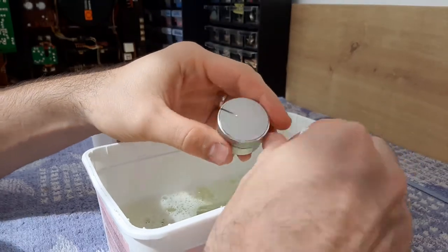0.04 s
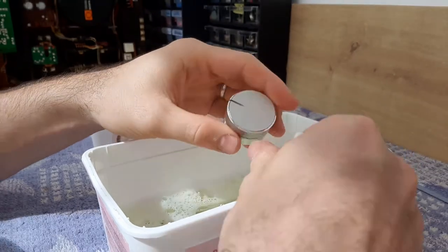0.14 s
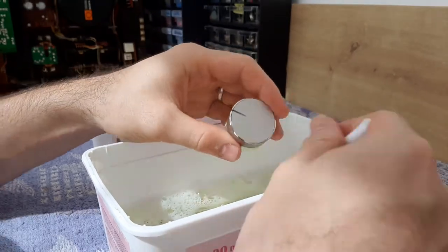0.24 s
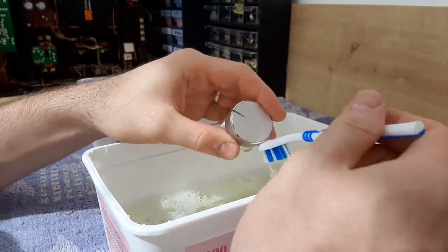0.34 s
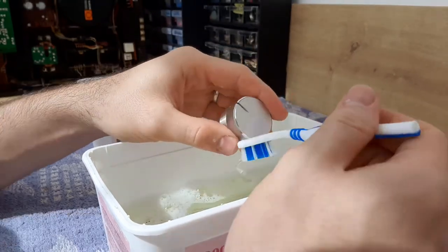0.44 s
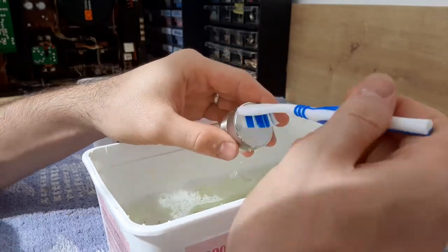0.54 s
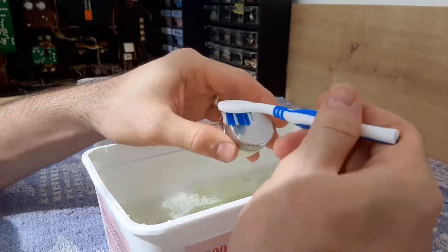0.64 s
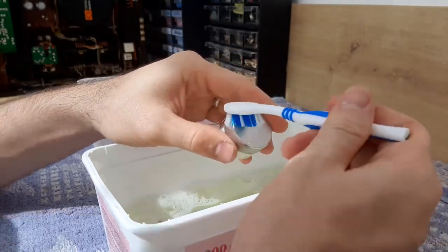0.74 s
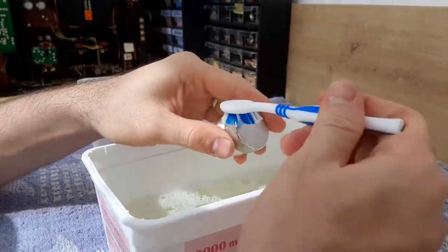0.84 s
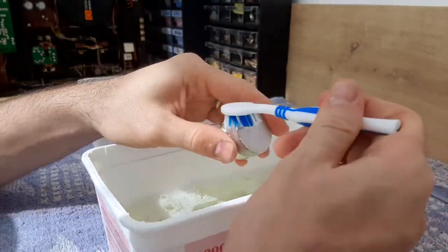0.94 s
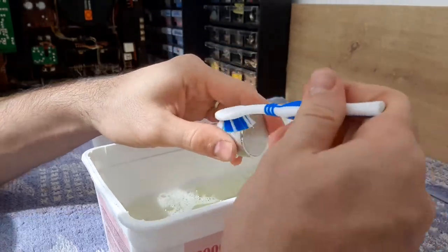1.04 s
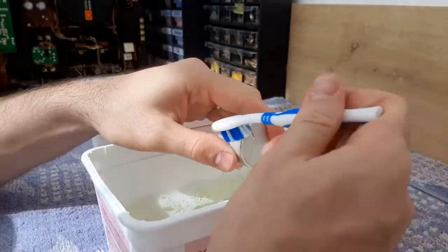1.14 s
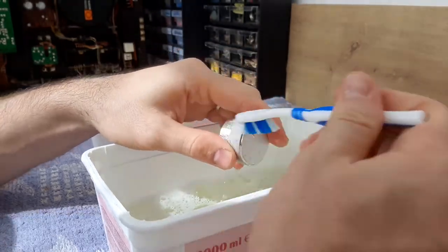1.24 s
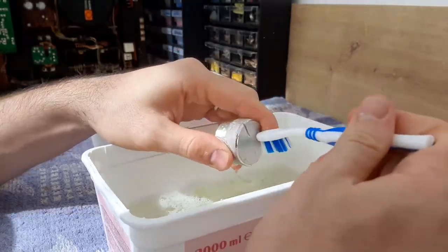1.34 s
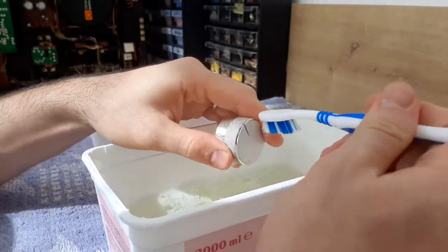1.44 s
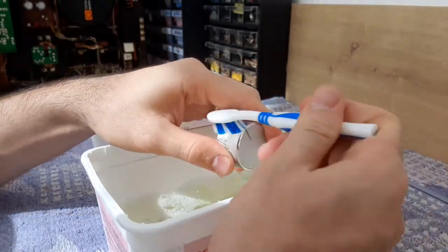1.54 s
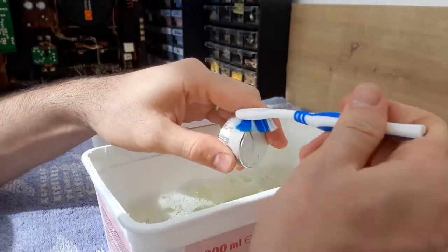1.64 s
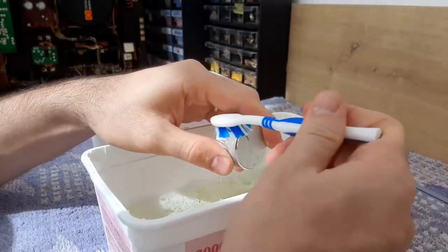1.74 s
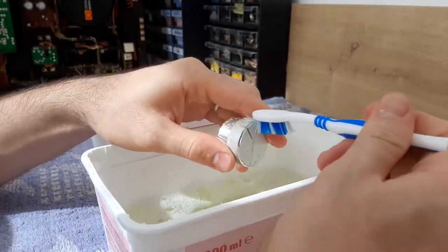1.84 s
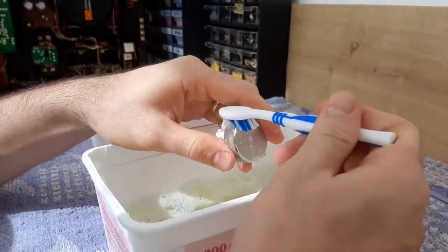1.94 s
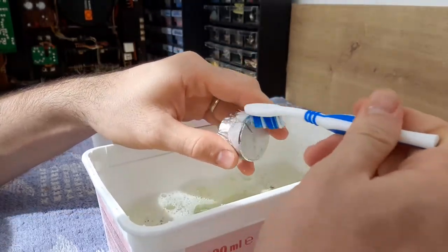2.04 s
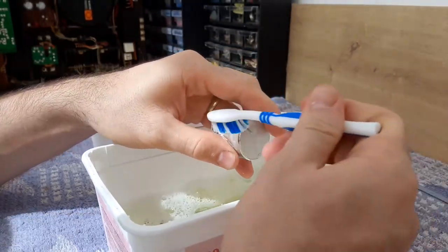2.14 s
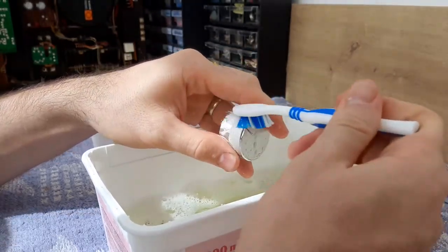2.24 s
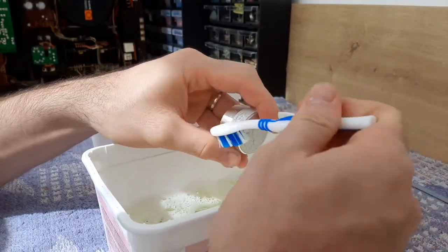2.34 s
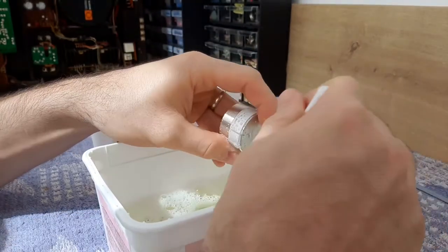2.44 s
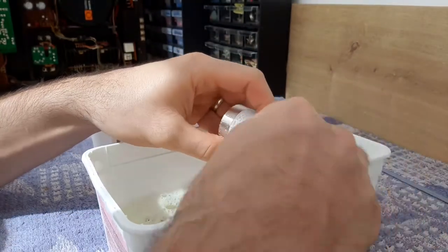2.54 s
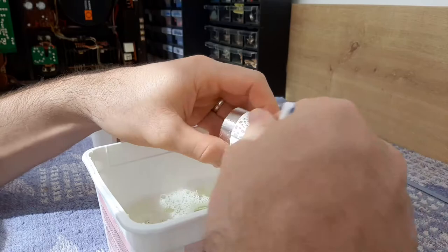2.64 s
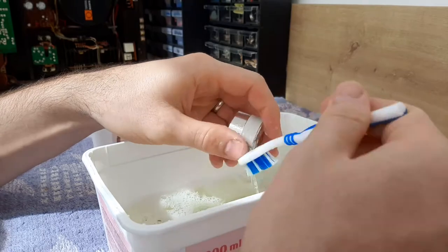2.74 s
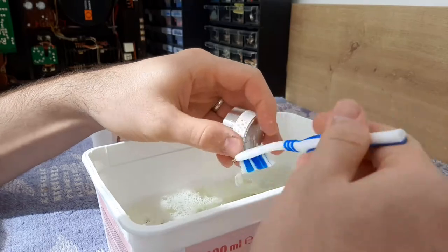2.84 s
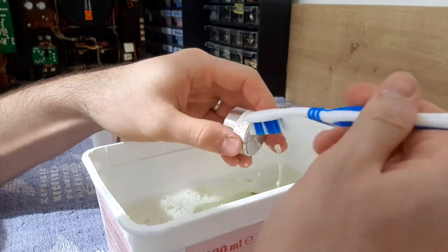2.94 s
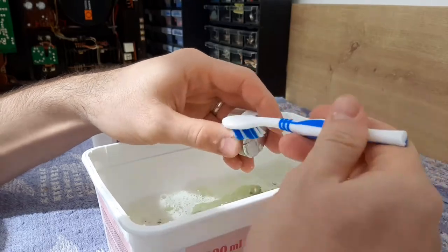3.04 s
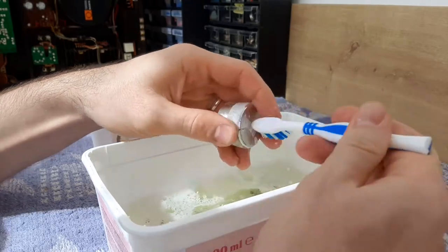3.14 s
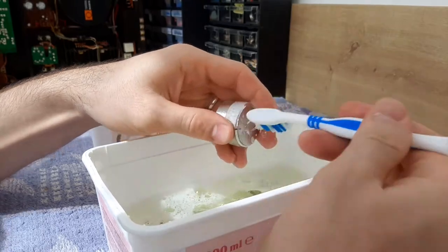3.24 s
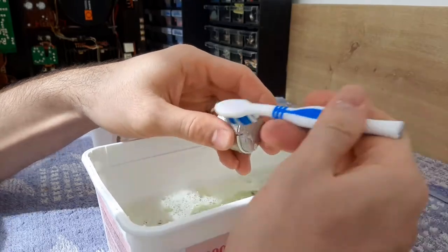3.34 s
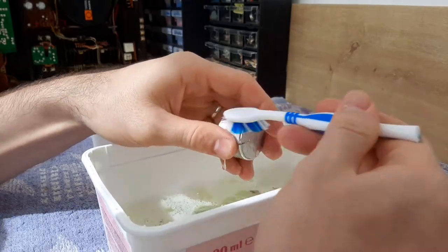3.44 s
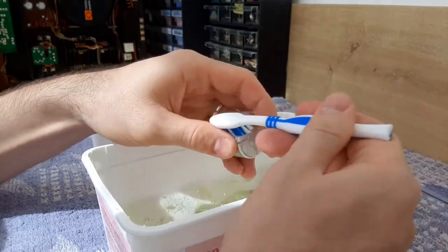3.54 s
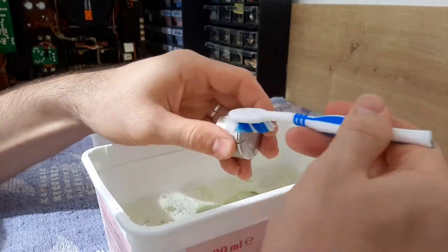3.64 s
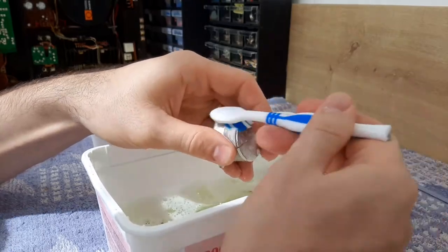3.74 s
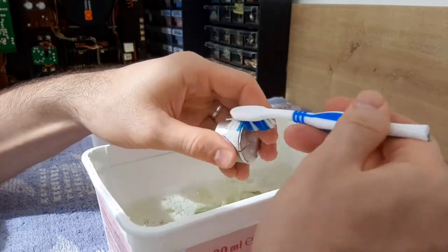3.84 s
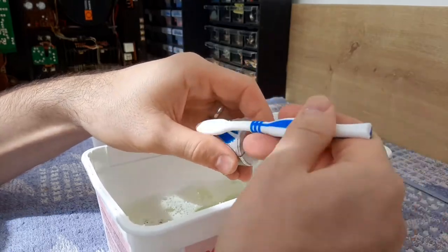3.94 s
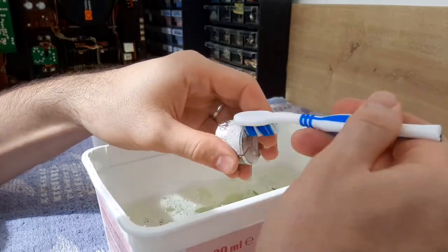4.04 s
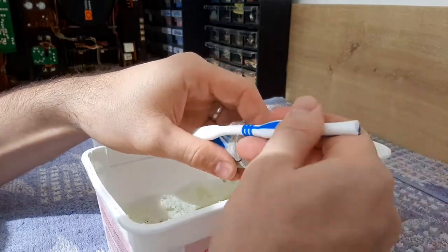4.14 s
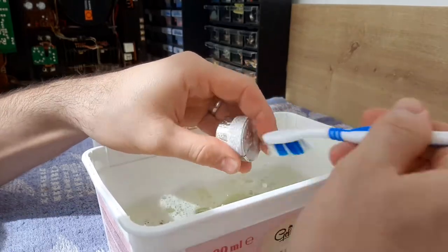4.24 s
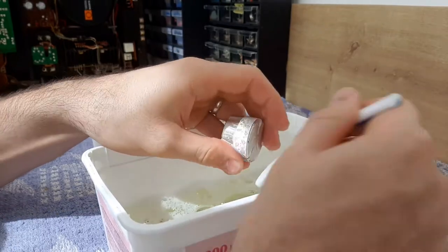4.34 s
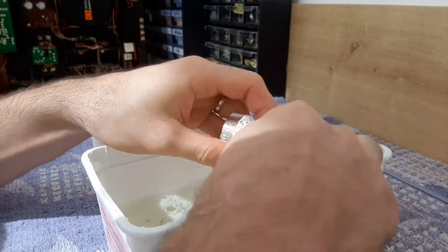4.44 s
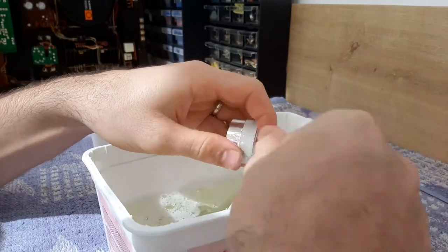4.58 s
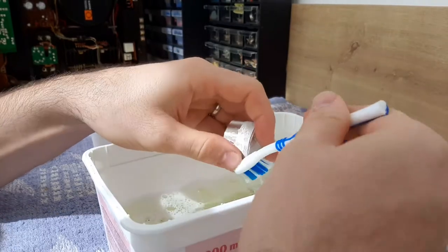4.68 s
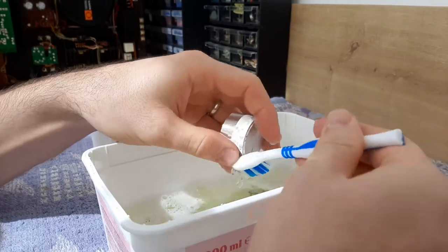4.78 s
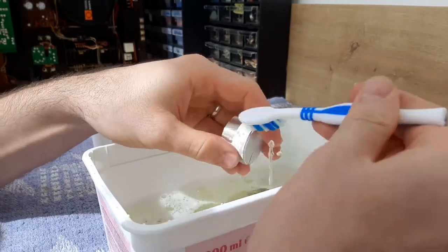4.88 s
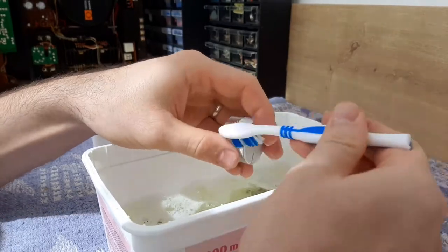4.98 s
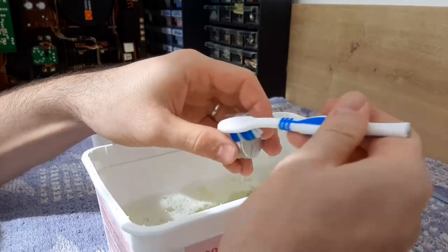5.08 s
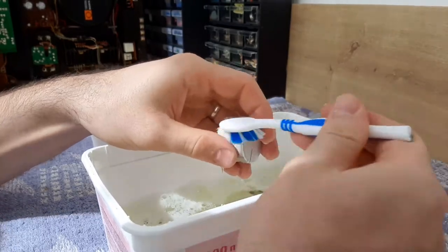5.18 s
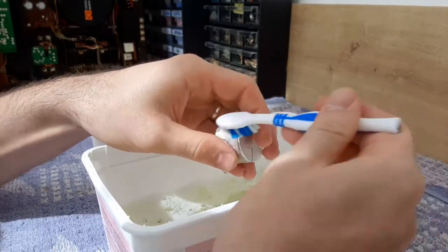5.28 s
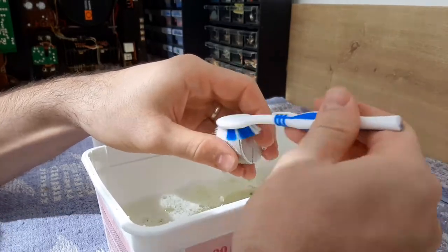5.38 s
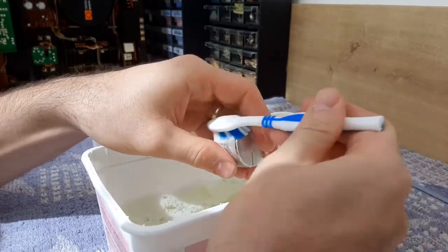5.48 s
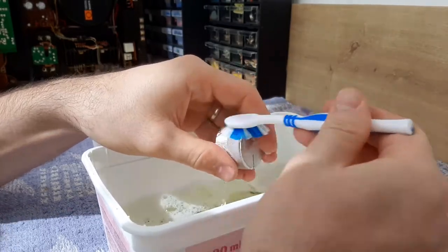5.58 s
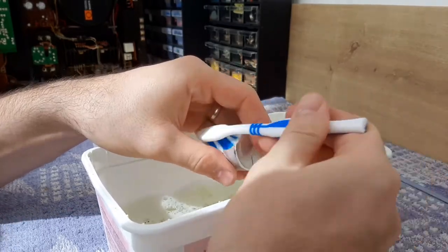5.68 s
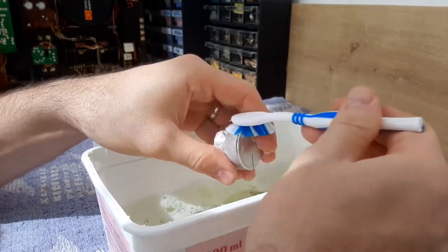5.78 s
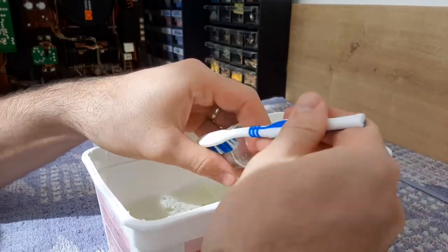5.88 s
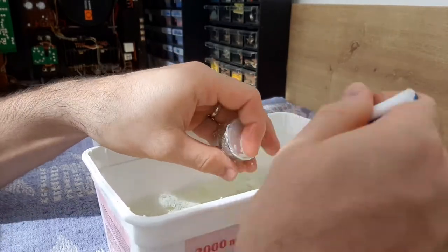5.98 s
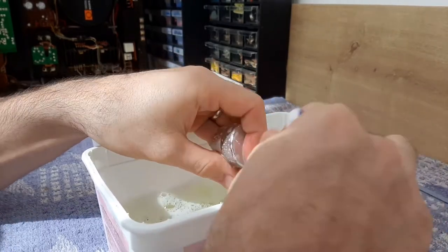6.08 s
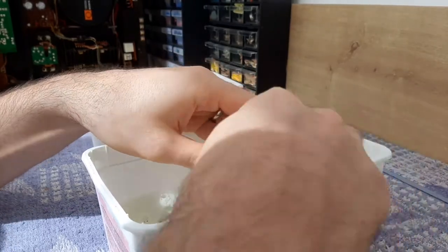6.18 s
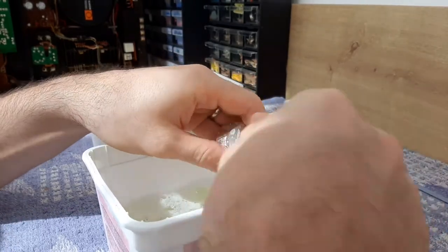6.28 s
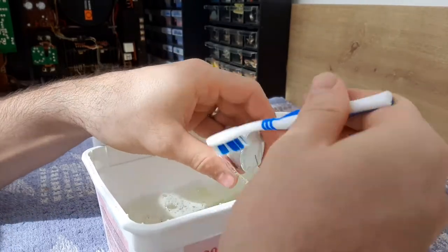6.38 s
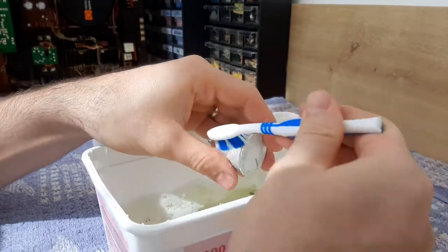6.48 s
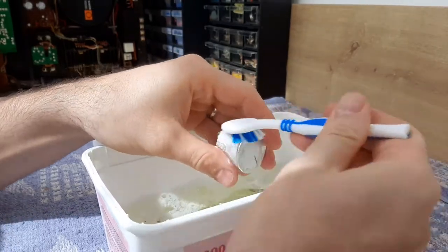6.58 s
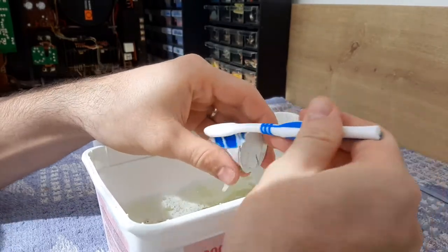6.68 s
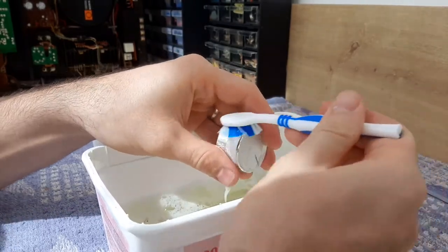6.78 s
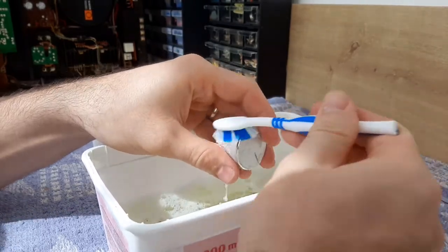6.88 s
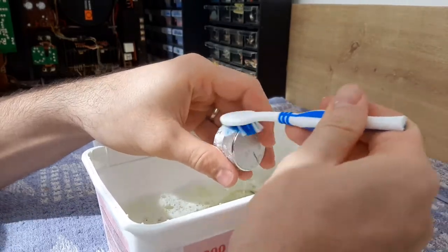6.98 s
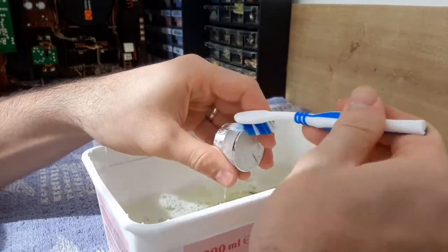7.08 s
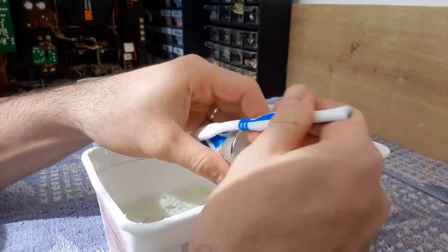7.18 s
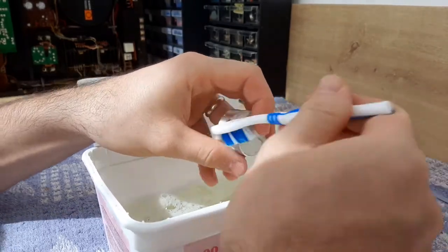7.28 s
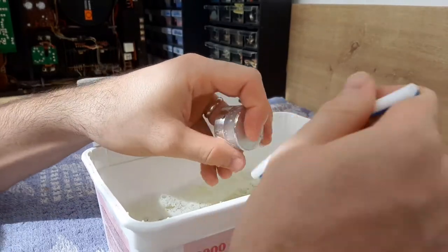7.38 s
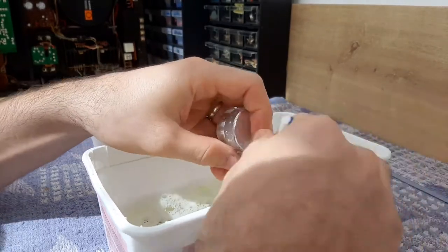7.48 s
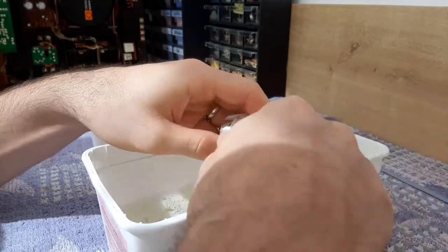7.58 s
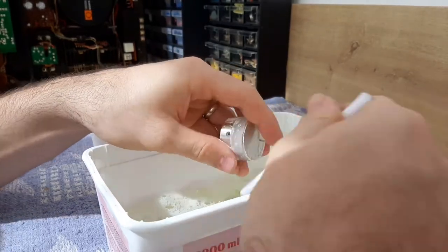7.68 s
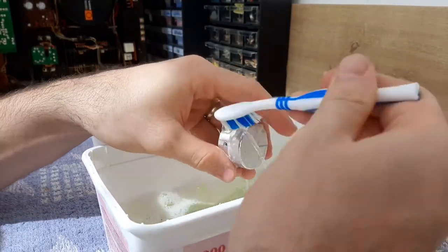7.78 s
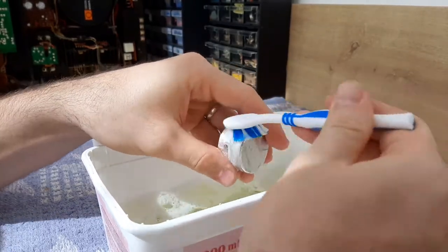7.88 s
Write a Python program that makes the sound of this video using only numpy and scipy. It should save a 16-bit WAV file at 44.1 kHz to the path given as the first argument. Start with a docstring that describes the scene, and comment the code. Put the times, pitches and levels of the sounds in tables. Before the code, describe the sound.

A toothbrush scrubs a wet metal knob in quick scratchy strokes, pausing for swishing dips and soft knocks in a plastic tub of water.

```python
"""A small room, a stereo microphone close to a wet metal knob held over a plastic tub of soapy water.
Over very quiet air come a soft knock and a tick of the hard toothbrush head on the metal. Then scrubbing
starts: each push and pull is a swell of tiny slips; bristles flick, and the hand bumps the tub.
Four runs of strokes each end in a dip, near 2.6, 4.6, 6.1 and 7.6 s, swishing, knocking and dripping.
Two light grazes of the bristles come last."""
import sys
import numpy as np
from scipy import signal
from scipy.fft import rfft, irfft, next_fast_len
from scipy.io import wavfile

SR = 44100
rng = np.random.default_rng(int(sys.argv[2]) if len(sys.argv) > 2 else 0)


def to_wav(sig):
    """Store sig (one row per channel, or 1-D mono) as 16-bit WAV at the path in sys.argv[1].

    Samples outside -1..1 are clipped; the rate is SR.
    """
    pcm = np.clip(np.atleast_2d(sig), -1, 1) * 32767
    pcm = np.round(pcm).astype(np.int16)
    wavfile.write(sys.argv[1], SR, pcm.T)  # frames by channels


N = 349267
T = np.arange(N) / SR

# spectrum of bristle slips: f/Hz, level/dB
BRISTLES = [(1500, -26.5), (3200, -46), (4000, -5.5), (5000, -7), (6200, -4.5), (7500, -2.5), (8600, -5),
            (10000, -6.5), (12200, -2.5), (14000, -4.5), (16000, -1.5)]
# strokes to and fro: t/s of the push, wait/s until the pull, push/dB, pull/dB, bump on the tub/dB
SCRUBS = [(0.814, 0.092, -51, -46, -49.5), (1.016, 0.099, -37.5, -43, -46.5),
          (1.201, 0.084, -42, -36.5, -38), (1.581, 0.087, -41.5, -37.5, -33.5),
          (1.77, .086, -42, -39, -42.5), (1.969, 0.1, -43.5, -45.5, -127), (2.16, 0.078, -38.5, -39, -41.5),
          (2.33, 0.07, -42, -42.5, -79), (3.399, 0.093, -50.5, -39, -35.5), (3.584, .107, -40, -38.5, -46),
          (3.786, 0.084, -36, -41, -37), (3.964, 0.088, -36, -36.5, -36), (4.153, 0.097, -35, -36, -32.5),
          (5.127, 0.11, -41, -39, -36.5), (5.334, 0.097, -38, -37, -34.5), (5.523, .09, -36.5, -35.5, -37),
          (5.708, 0.093, -34.5, -34.5, -36), (5.906, 0.06, -38.5, -41.5, -47.5),
          (6.653, 0.096, -36, -36, -39.5), (6.847, 0.081, -40, -35, -42), (7.027, .08, -42, -43.5, -61.5),
          (7.205, 0.11, -34.5, -38.5, -33.5)]
# dips of the brush into the water: t/s at the strongest, length/s, swish/dB, jostling of the tub/dB
DIPS = [(2.571, 0.036, -48.5, -54.5), (4.587, 0.1, -45.5, -47), (6.13, 0.039, -42, -36),
        (7.552, 0.063, -57, -44)]


def undb(db):
    """Decibels to gain."""
    return 10 ** (np.asarray(db) / 20)


def unit(x):
    """Scale to rms 1."""
    return x / np.sqrt(np.mean(x ** 2))


def lookup(points, hz):
    """Read (f/Hz, value) points on a log-frequency axis."""
    f, value = np.transpose(points)
    return np.interp(np.log(np.maximum(hz, 1)), np.log(f), value)


def colour(x, points):
    """Filter by a curve of (f/Hz, level/dB) points and scale to rms 1."""
    n = x.shape[-1]
    size = next_fast_len(n)
    gain = undb(lookup(points, np.fft.rfftfreq(size, 1 / SR)))
    return unit(irfft(rfft(x, size) * gain, size)[..., :n])


def ring(modes, t):
    """Response of (f/Hz, level/dB, t60/s) modes to one blow; neighbours swing in opposite directions."""
    return sum((-1) ** k * undb(db) * np.sin(2 * np.pi * hz * t) * np.exp(-np.log(1000) * t / t60)
               for k, (hz, db, t60) in enumerate(modes))


def burst(x, db, seconds):
    """Scale a hit so that its energy equals db held for that long."""
    return x * undb(db) * np.sqrt(seconds * SR / np.sum(x ** 2))


def add(out, s, x):
    """Mix x into out from time s."""
    i = max(int(s * SR), 0)
    out[..., i:i + x.shape[-1]] += x[..., :max(N - i, 0)]


def pan(db):
    """Gains of constant power, left over right by db."""
    return unit(undb(np.array([[db], [-db]]) / 2))


def swell(s, length):
    """A bell of power around time s, length wide at half height."""
    out = np.zeros(N)
    near = slice(max(int((s - 3 * length) * SR), 0), int((s + 3 * length) * SR))
    out[near] = 2 ** -((2 * (T[near] - s) / length) ** 2)
    return out


def walk(rate):
    """Random wander of rms 1 through rate points a second."""
    knots = rng.standard_normal(N // 20)
    return unit(np.interp(T * rate, np.arange(len(knots)), knots))


def room_air():
    """Very quiet, low room tone, nearly alike on both sides."""
    # spectrum of the air: f/Hz, level/dB
    spectrum = [(25, -32), (45, 11), (70, 7.5), (150, 0.5), (300, -7.5), (600, -15), (1500, -16.5),
                (5000, -24.5), (16000, -38.5)]
    return undb(-68) * colour(rng.standard_normal(N) + 0.13 * rng.standard_normal((2, N)), spectrum)


def room(x, wet_db, onset_s=0.0019, alike_hz=500):
    """The near walls return a diffuse tail that dies band by band; its bass is more alike on both sides."""
    # decay of the room: f/Hz, t60/s
    decays = [(80, 0.62), (300, 0.44), (1000, 0.37), (3000, 0.29), (8000, 0.17), (15000, 0.16)]
    t = T[:32768]
    hz = np.fft.rfftfreq(len(t), 1 / SR)
    mid, side = rfft(rng.standard_normal((2, len(t))))
    spread = np.minimum(.5 + hz / alike_hz / 2, 1)
    noise = (mid + np.array([[1], [-1]]) * spread * side) / np.sqrt(1 + spread ** 2)
    tail = 0
    for weights, (_, t60) in zip(np.eye(len(decays)), decays):
        band = lookup([(f, w) for (f, _), w in zip(decays, weights)], hz)
        tail += irfft(noise * band) * np.exp(-np.log(1000) * t / t60)
    tail *= 1 - np.exp(-(t / onset_s) ** 2)
    tail *= undb(wet_db) / np.sqrt(np.sum(tail ** 2) / 2)
    crossfed = 0.75 * x + 0.25 * x[::-1]
    return signal.fftconvolve(crossfed, tail, axes=1)[:, :N]


def ports(x):
    """A close sound reaches the microphone's two ports directly and off the hands and tub."""
    # paths to the left port, then to the right: delay/ms, gain
    paths = [
        [(0, 1), (.62, .3), (1.9, .35)],
        [(.09, 1), (.37, -.4), (1.3, .35)],
    ]
    return np.array([sum(gain * np.roll(x, round(ms * SR / 1000)) for ms, gain in taps)
                     / np.hypot.reduce([gain for _, gain in taps]) for taps in paths])


def clicks(rate, spread_db):
    """Random tiny clicks of uneven size, about rate a second."""
    sizes = undb(spread_db * np.minimum(rng.exponential(size=N), 4))
    return unit((rng.random(N) < rate / SR) * rng.choice([-1, 1], N) * sizes)


def crackle(spectrum, rate, spread_db, apart):
    """Coloured clicks: some reach both ports, others, at gain apart, only one."""
    separate = np.array([clicks(rate, spread_db) for _ in range(2)])
    return colour(ports(clicks(rate, spread_db)) + apart * separate, spectrum)


def suds(stroke_db=-25, foam_db=-69, linger_s=.19):
    """Tiny soap bubbles burst for a moment after a stroke works them up or a dip breaks the foam."""
    lather = sum(swell(s + linger_s / 3, linger_s) * undb(2 * (db + stroke_db)) * length / linger_s
                 for s, length, db in strokes())
    foam = undb(2 * foam_db) * sum(swell(s + linger_s / 2, linger_s) for s, *_ in DIPS)
    fizz = crackle(BRISTLES, rate=130, spread_db=3, apart=.5)
    return np.sqrt(lather + foam) * fizz * pan(db=11)


def drips(dribble_s=0.27, dribble_hz=2450, dribble_db=-73, fade_cycles=13, glide=0.069):
    """Each drop traps a bubble that rings briefly, rising in pitch; faint dribbles follow every dip."""
    # drops falling back into the tub: t/s, f/Hz, level/dB
    drops = [(2.377, 2780, -41.5), (2.638, 2860, -51), (4.47, 3340, -55), (4.567, 4250, -43),
             (4.81, 3820, -45.5), (7.342, 2710, -36)]
    out, t = np.zeros(N), T[:2048]
    dribbles = [(s + dribble_s * rng.random(),
                 dribble_hz * 2 ** rng.uniform(-1.06, 1),
                 dribble_db + 4 * rng.standard_normal()) for s, *_ in DIPS for _ in range(5)]
    for s, hz, db in drops + dribbles:
        age = t * hz / fade_cycles
        envelope = np.sqrt(age) * np.exp(-np.log(100) * age)
        bubble = np.sin(2 * np.pi * hz * t * (1 + glide * age / 2)) * envelope
        add(out, s, burst(bubble, db, 0.0021))
    return ports(out) * pan(db=9.5)


def swishes(slosh_db=3.5, wash_lag_s=0.025, wash_db=-5.5):
    """The bristles stir the water, which washes back, and drag along the plastic."""
    # short wet swipes: t/s at the middle, length/s, level/dB
    swipes = [(0.056, 0.16, -65.5), (3.067, 0.042, -56.5), (3.442, 0.061, -54.5), (4.65, 0.028, -34),
              (7.216, 0.0097, -40.5), (7.5, 0.026, -51.5), (7.698, 0.024, -43)]
    power = sum(undb(2 * db) * (swell(s, length) + undb(2 * wash_db) * swell(s + wash_lag_s, 2 * length))
                for s, length, db, _ in DIPS)
    power += sum(swell(s, length) * undb(2 * db) for s, length, db in swipes)
    # spectrum of stirred water: f/Hz, level/dB
    water = [(150, -23.5), (330, 8.5), (430, -4.5), (600, -7.5), (900, -4.5), (1280, -11), (1650, -28),
             (2150, -18), (2750, -25.5), (3300, -30.5), (4500, -25), (7000, -37.5), (16000, -56)]
    slosh = undb(slosh_db * walk(170))
    return slosh * np.sqrt(power) * crackle(water, rate=3200, spread_db=2.7, apart=.35) * pan(db=1.8)


def jostles(gap_s=.055, fade_db_per_s=79.5, push_hz=330, clack_db=-35):
    """Rows for knocks(): after a dip the brush jostles the tub at uneven gaps, ever more softly."""
    rows = []
    for s, _, _, db in DIPS:
        for late in gap_s * (np.arange(4) + .5 + rng.random(4) / 2):
            thud = db - fade_db_per_s * late
            rows.append((s + late, thud, push_hz, thud + clack_db))
    return rows


def bumps(lag_s=0.00455, firm_db=-45.5, oct_per_db=.02, scatter_oct=0.38):
    """Rows for knocks(): the hand bumps the tub just after mid-push and nudges it on turning round."""
    rows = []
    for s, wait, _, _, db in SCRUBS:
        # a firmer bump tends to be harder: it reaches higher and clacks more
        hardness = 2 ** (oct_per_db * (db - firm_db) + scatter_oct * rng.standard_normal(2))
        push, turn = hardness
        push_clack_db, turn_clack_db = 40 * np.log10(hardness) + [-24.5, -21]
        turn_db = db - 8
        rows.append((s + lag_s, db, 366 * push, db + push_clack_db))
        rows.append((s + .72 * wait, turn_db, 270 * turn, turn_db + turn_clack_db))
    return rows


def knocks(clack_band_hz=(620, 1900)):
    """A soft push wakes only the low modes of the tub; a hard edge adds a clack in the upper ones."""
    # single knocks of hand and brush: t/s, thud/dB, roll-off of the push/Hz, clack/dB
    blows = [(0.074, -52, 190, -73), (2.548, -28.5, 126, -53), (2.559, -41.5, 306, -44.5),
             (2.583, -40.5, 396, -53.5), (3.049, -39.5, 423, -54.5), (3.464, -46.5, 282, -48.5),
             (3.922, -40, 400, -54), (4.454, -27, 136.6, -82), (4.507, -35.5, 420, -37),
             (4.545, -38, 422, -70), (4.556, -35.5, 510, -24.5), (4.639, -36, 487, -28.5),
             (5.777, -61, 437, -46), (6.068, -39.5, 444, -55), (6.089, -30.5, 580, -32.5),
             (6.098, -16.5, 380, -35), (6.119, -42, 228, -50), (6.21, -37.5, 346, -46.5),
             (6.26, -38.5, 380, -60), (7.2794, -37, 440, -30.5), (7.503, -25.5, 158, -52),
             (7.567, -37.5, 455, -33), (7.866, -42, 178, -62.5)]
    # modes of the tub of water: f/Hz, level/dB, t60/s, left minus right/dB
    tub_modes = [(64.8, 3.5, 0.35, 8), (91.35, -2, 0.4, 4), (110.3, -5.5, .14, 17),
                 (148.36, -20.5, 0.78, -7), (154.6, 5, 0.053, -1.5), (236.2, -20.5, 0.33, -3),
                 (285.7, -11.5, .24, -1), (305.3, 5, 0.021, 0.5), (353.8, -22, .35, 11),
                 (439, -13, 0.034, 5), (532, -13.5, 0.029, 3.5), (774, -22, 0.088, 7.5),
                 (815, -17.5, 0.11, 2), (838, -0.5, 0.014, 2), (1108, -11.5, 0.014, -3.5),
                 (1228, -13.5, .026, 11)]
    out, t, lead = np.zeros((2, N)), T[:16384], SR // 100
    hz = np.fft.rfftfreq(len(t), 1 / SR)
    edge = signal.butter(3, clack_band_hz, "band", fs=SR, output="sos")
    for s, thud_db, push_hz, clack_db in blows + bumps() + jostles():
        spot = rng.standard_normal((len(tub_modes), 2)) * [.015, 2.2]
        sides = [[(f * (1 + detune), db + shift_db + side * lean_db / 2, t60)
                  for (f, db, t60, lean_db), (detune, shift_db) in zip(tub_modes, spot)]
                 for side in (1, -1)]
        wall = np.roll([ring(modes, t) for modes in sides], lead, axis=1)
        # the speed of the wall makes the sound
        thud = irfft(rfft(wall) * 1j * hz * np.exp(-(hz / push_hz) ** 2))
        clack = signal.sosfilt(edge, wall)
        add(out, s - lead / SR, burst(thud, thud_db, 0.044) + burst(clack, clack_db, 0.011))
    return out


def ticks(snap_s=.001, focus_db=4):
    """Sharp ticks, a snap and a choked ring: the brush head taps the metal, or a bristle flicks."""
    # ticks: t/s, snap/dB, ring/dB, favoured f/Hz, left minus right/dB
    # the one at 3.36 s is tiny and high, like a small bubble popping
    events = [(0.3649, -32, -44.5, 1990, 8), (1.0138, -43, -65, 3080, 18), (1.359, -35.5, -31.5, 1860, 8),
              (1.9682, -60, -72, 2890, 15), (3.1403, -20, -28, 2900, 7.5), (3.1644, -33, -39.5, 2420, -12),
              (3.3616, -46.5, -83, 4030, 9), (3.502, -44, -43, 2160, 8), (3.518, -43, -37.5, 1740, 8),
              (3.572, -34, -91, 4000, 2), (3.758, -42, -67, 3650, 9), (4.2518, -37.5, -40, 4440, 5),
              (4.507, -52, -49.5, 1580, 29), (4.5534, -37, -27.5, 2800, 4), (4.6845, -53, -40.5, 3980, 22),
              (6.096, -48, -46, 3120, 5), (6.4772, -47, -77, 3970, 14), (7.184, -45, -68, 2820, -3),
              (7.31, -29, -60, 3300, 0), (7.5677, -50.5, -43.5, 1980, 3)]
    # modes of knob and brush head, damped by the fingers: f/Hz, level/dB, t60/s
    knob_modes = [(823, 5, 0.0024), (1543, -21.5, 0.029), (1990, 0, 0.0041), (2890, 0, 0.0049),
                  (4000, 3.5, 0.0081), (4620, 11.5, 0.0013)]
    # spectrum of the snap: f/Hz, level/dB
    snap_spectrum = [(1200, -10), (3500, -7.5), (5500, 1), (8000, 3), (11000, 1), (16000, -5.5)]
    out, t, lead = np.zeros((2, N)), T[:2048], SR // 2000
    for s, snap_db, ring_db, pitch_hz, pan_db in events:
        crack = rng.standard_normal((2, len(t))) * np.exp(-t / snap_s)
        snap = colour(np.roll(crack, lead, axis=1), snap_spectrum)
        spot = rng.standard_normal((len(knob_modes), 2))  # every tick favours other modes
        modes = [(hz * (1 + 0.012 * detune), db + shift_db - focus_db * np.log2(hz / pitch_hz) ** 2, t60)
                 for (hz, db, t60), (detune, shift_db) in zip(knob_modes, spot)]
        ringing = np.roll(ring(modes, t), lead)
        tick = burst(snap, snap_db, 0.0066) + ports(burst(ringing, ring_db, 0.0046))
        add(out, s - lead / SR, tick * pan(pan_db))
    return out


def squeaks(waver_hz=260):
    """A wet tuft sticks and slips at an unsteady pitch for part of a stroke."""
    # squeaking tufts: t/s at the middle, length/s, f/Hz, level/dB
    tufts = [(3.578, 0.01, 4610, -42.5), (5.326, 0.018, 7600, -41.5), (5.968, 0.0037, 5100, -39)]
    out = 0
    for s, length, hz, db in tufts:
        tone = unit(np.sin(2 * np.pi * np.cumsum(hz + waver_hz * walk(900)) / SR))
        out += undb(db) * np.sqrt(swell(s, length)) * tone
    return ports(out) * pan(db=6.8)


def hand_echo(x, lag_ms=0.418, swing_oct=0.39, echo_db=-10):
    """The moving hand throws the hiss back a little later, so hollow notches slide through it."""
    late = lag_ms / 1000 * 2 ** (swing_oct * walk(9))
    echo = np.array([np.interp(T - late, T, side) for side in x])
    return unit(x + undb(echo_db) * echo)


def brush_turning(x, depth_db=1.6, rate=18, bands=8):
    """The colour shifts as the brush turns: every treble band wanders in level on its own."""
    size = next_fast_len(N)
    spectrum, hz = rfft(x, size), np.fft.rfftfreq(size, 1 / SR)
    centres_hz = np.geomspace(3000, 15000, bands)
    out = 0
    for weights in np.eye(bands):
        band = irfft(spectrum * lookup(np.transpose([centres_hz, weights]), hz), size)[:, :N]
        out += band * undb(depth_db * walk(rate))
    return unit(out)


def strokes(sweep_s=.031):
    """Every push, pull and graze across the knob as t/s, length/s, level/dB."""
    # the brush lands or lifts off: t/s at the middle, length/s, level/dB
    grazes = [(0.474, 0.026, -52.5), (0.708, 0.072, -63.5), (3.038, 0.026, -59.5), (3.132, 0.045, -45),
              (4.967, .014, -47.5), (5.043, 0.033, -48.5), (6.563, 0.052, -40.5), (7.27, 0.015, -44.5),
              (7.857, 0.014, -47.5), (7.918, 0.04, -47.5)]
    pushes = [(s, sweep_s, db) for s, _, db, _, _ in SCRUBS]
    pulls = [(s + wait, sweep_s, db) for s, wait, _, db, _ in SCRUBS]
    return pushes + pulls + grazes


def scrubbing(rasp_db=-1, tuft_db=3.07, flick_db=-16, split_hz=9000, bright_db=1, scatter_db=1.5):
    """Bristle slips swell with the speed of each stroke; tufts catch and let go; bent bristles rasp lower."""
    # spectrum of the rasp: f/Hz, level/dB
    rasp_spectrum = [(500, -22.5), (1200, -25), (1700, -25.5), (2100, -13.5), (2500, -10.5), (2900, -12.5),
                     (3500, -11), (5000, -13.5)]
    # rise and fall of the rasp as the bristles bend: t/s, level/dB
    bend = [(.4, 8), (.9, -17), (1.3, -10.5), (2.4, -13), (3.5, -4.5), (3.9, -12.5), (5.8, -13.5),
            (6.6, -8.5), (7.3, -5), (7.9, -11)]
    low_power, high_power = np.zeros((2, N))
    for s, length, db in strokes():
        power = swell(s, length) * undb(2 * db)
        high_share = 1 / (1 + undb(-2 * (bright_db + scatter_db * rng.standard_normal())))
        low_power += 2 * (1 - high_share) * power
        high_power += 2 * high_share * power
    slips = crackle(BRISTLES, rate=16000, spread_db=-3, apart=1)
    flicks = undb(flick_db) * crackle(BRISTLES, rate=220, spread_db=4, apart=.3)
    hiss = brush_turning(hand_echo(slips + flicks))
    low = signal.sosfiltfilt(signal.butter(2, split_hz, fs=SR, output="sos"), hiss)
    sound = low * np.sqrt(low_power) * pan(db=3.5) + (hiss - low) * np.sqrt(high_power) * pan(db=10.5)
    rasp_gain = np.sqrt((low_power + high_power) / 2) * undb(rasp_db + np.interp(T, *np.transpose(bend)))
    sound += rasp_gain * crackle(rasp_spectrum, rate=4000, spread_db=-0.5, apart=1) * pan(db=6)
    return sound * undb(tuft_db * walk(220))


def scene():
    """Brush and knob close up and to the left, the tub below, the small room around them."""
    air = room_air()
    brush = scrubbing() + squeaks() + suds() + drips()
    ticking = ticks()
    tub = knocks() + swishes()
    # a towel and the hands soak up the top of a tick before it reaches the walls
    muffled = signal.sosfilt(signal.butter(1, 7000, fs=SR, output="sos"), ticking)
    reverb = room(brush, wet_db=-5) + room(muffled, wet_db=-1.5) + room(tub, wet_db=-8)
    return air + reverb + tub + ticking + brush


def record(dry, bass_hz=54, top_hz=15900):
    """The microphone drops the deep bass and cuts the top."""
    thin = signal.sosfilt(signal.butter(5, bass_hz, "high", fs=SR, output="sos"), dry)
    return signal.sosfilt(signal.ellip(10, .2, 70, top_hz, fs=SR, output="sos"), thin)


dry = scene()
out = record(dry)
to_wav(out)
```